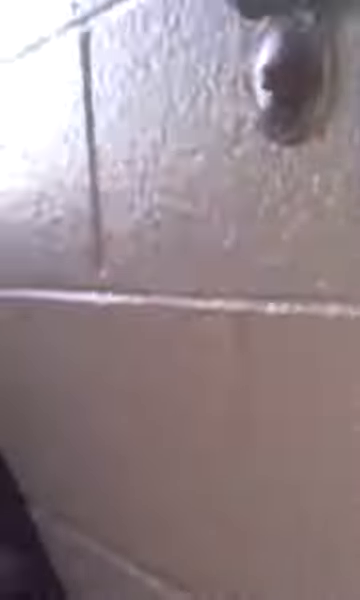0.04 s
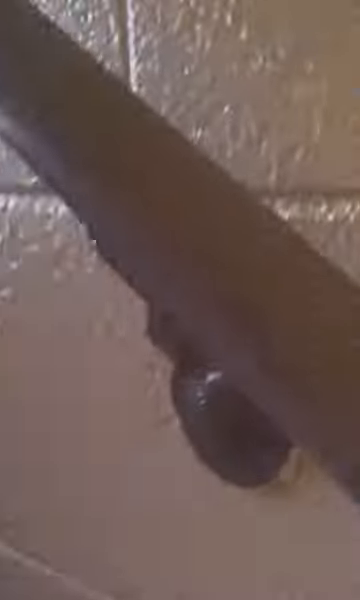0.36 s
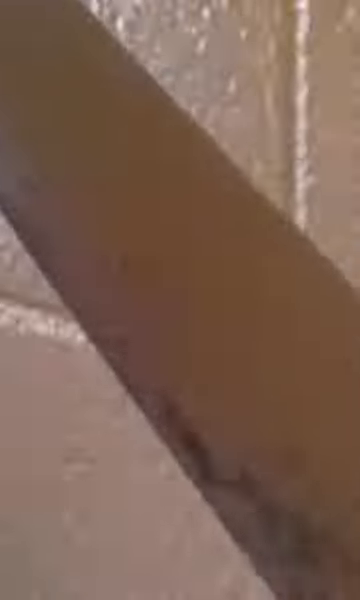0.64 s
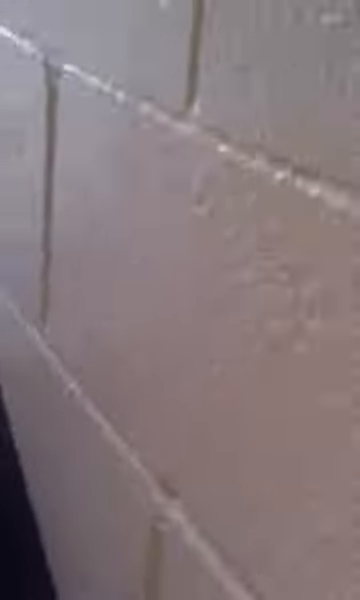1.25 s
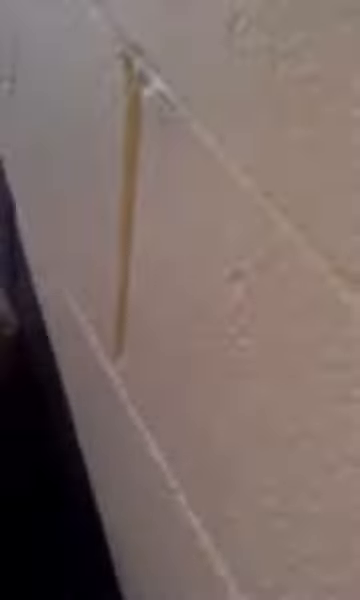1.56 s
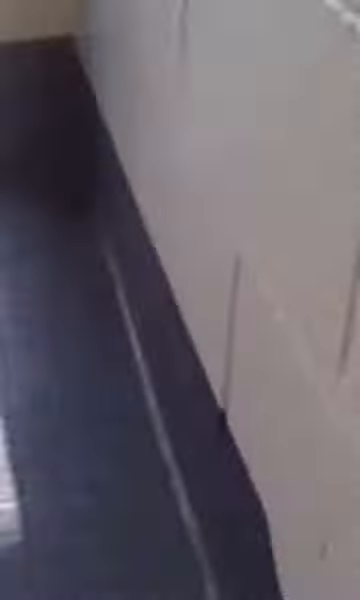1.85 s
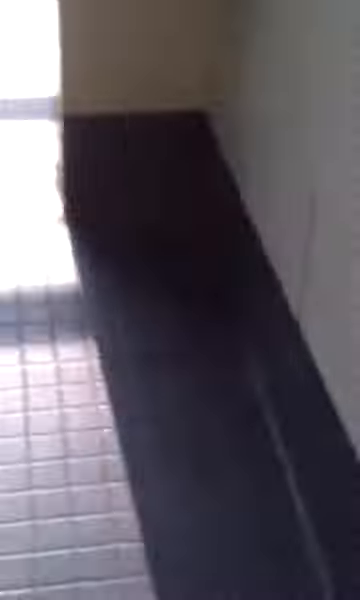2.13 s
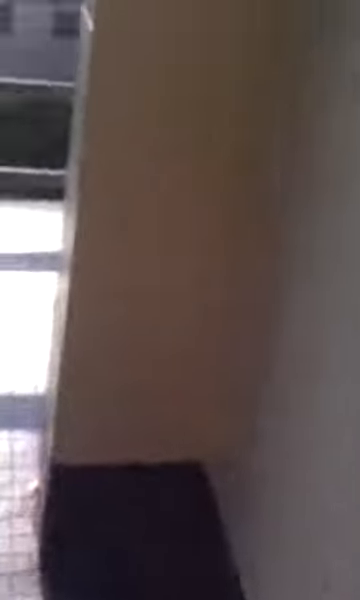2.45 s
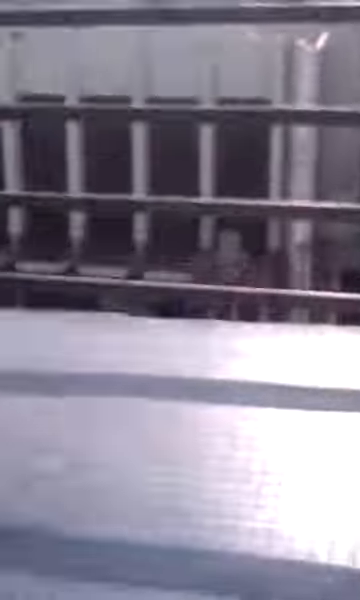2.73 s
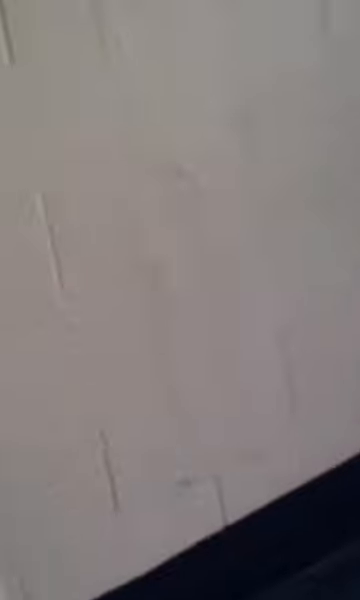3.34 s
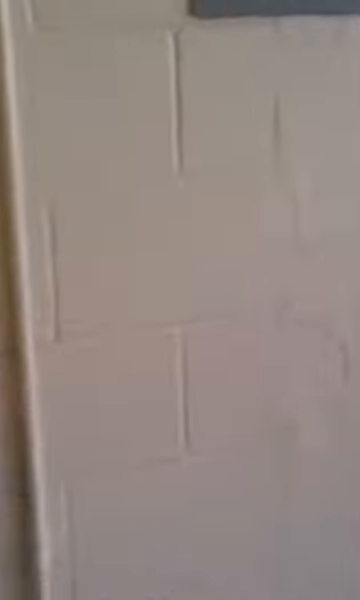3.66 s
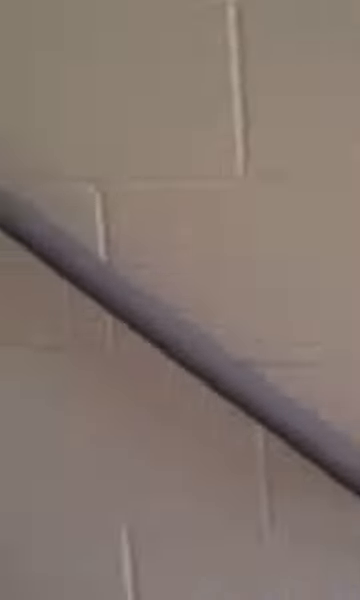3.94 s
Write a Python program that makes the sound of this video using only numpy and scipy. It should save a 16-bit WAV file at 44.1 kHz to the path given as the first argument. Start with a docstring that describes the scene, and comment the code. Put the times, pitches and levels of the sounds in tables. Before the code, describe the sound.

Shoes go down a ringing stairwell at about two steps a second, with air rushing behind them. The sound turns muffled as a hand bumps and creaks on the microphone, then opens up again for more steps.

```python
"""Shoes slap and scuff down hard stairs in a ringing block-walled stairwell, over a steady rush of air.
The recorder rides in the walker's hand, and the steps land about twice a second.
Midway a finger slides over the microphone port: the room goes dull, the grip ticks, thumps
and creaks right at the microphone, then the port opens on the stairs again."""
import sys
import numpy as np
from scipy import signal
from scipy.fft import rfft, irfft
from scipy.io import wavfile
from scipy.ndimage import uniform_filter1d, map_coordinates

SR = 44100
rng = np.random.default_rng(int(sys.argv[2]) if len(sys.argv) > 2 else 0)


def to_wav(s):
    """Save 16-bit WAV."""
    ch = np.atleast_2d(s).T  # columns
    pcm = np.round(np.clip(ch, -1, 1) * 32767)  # PCM
    wavfile.write(sys.argv[1], SR, pcm.astype(np.int16))


N = 176400
SNAP_HZ, BAND_EDGE_HZ = 7060, 8400

# Spectrum of a shoe on a tread. Each row: frequency in Hz, relative level in dB.
SHOE_SPECTRUM = [(30, -22.5), (90, -17), (170, -6.5), (260, 5.5), (480, 6), (690, 6), (1100, -1),
                 (1800, 1.5), (2400, 1.5), (3200, -3.5), (4400, -1.5), (5500, -13.5), (7100, -10),
                 (8500, -27)]


def amp(db):
    """Decibels to gain."""
    return 10 ** (np.asarray(db) / 20)


def unit(x):
    """Scales to rms 1."""
    return x / np.sqrt(np.mean(x ** 2) + 1e-20)


def curve(points, hz):
    """Interpolates (Hz, value) points on a log-frequency axis."""
    f, value = np.transpose(points)
    return np.interp(np.log(hz + 1), np.log(f + 1), value)


def bell(hz, centre, octaves):
    """A bell of height 1 on a log-frequency axis."""
    return np.exp(-.5 * (np.log2((hz + 1) / centre) / octaves) ** 2)


def add(mix, start_s, sound):
    """Mixes a sound in at a time."""
    part = mix[max(round(start_s * SR), 0):][:len(sound)]
    part += sound[:len(part)]


def noise(colour, size):
    """Noise of rms 1 whose spectrum in dB is colour(Hz)."""
    gain = amp(colour(np.fft.rfftfreq(size, 1 / SR)))
    return unit(irfft(rfft(rng.standard_normal(size)) * gain, size))


def crack(colour, decay_s, size=4096):
    """A crisp burst with the given spectrum and the energy of a unit noise dying in decay_s."""
    t = np.arange(size) / SR
    gain = amp(colour(abs(np.fft.fftfreq(size, 1 / SR))))
    burst = np.fft.fft(rng.standard_normal(size) * np.exp(-t / decay_s))
    burst /= np.sqrt(abs(burst) + 1e-12)  # evens out chance peaks
    minimum_phase = np.exp(np.conj(signal.hilbert(np.log(gain + 1e-5))))  # keeps the attack sharp
    x = np.fft.ifft(burst * minimum_phase).real[:size // 2]
    return x / np.linalg.norm(x) * np.sqrt(decay_s * SR / 2)


def spectra(x):
    """Short-time spectra: Hz column, frame times, values."""
    hz, t, frames = signal.stft(x, SR, nperseg=512, noverlap=384)
    return hz[:, None], t, frames


def waveform(frames):
    """Back from short-time spectra."""
    return signal.istft(frames, SR, nperseg=512, noverlap=384)[1][:N]


def stairwell_db(hz):
    """The colour that the stairwell's resonances give to sounds between its walls."""
    # Resonances. Each row: centre in Hz, width in Hz, lift in dB.
    resonances = [(231, 65, 2), (550, 18, 4.5), (673, 27, 4.5), (763, 50, 1.5), (916, 9.9, 2),
                  (1075, 25, 1.5), (1267, 25, 6.5), (1498, 11, 5.5), (1717, 14, 1), (2380, 19, 5),
                  (2560, 60, 3), (2760, 80, 1.5), (4015, 19, -2.5), (4430, 35, 1.5)]
    return sum(db / (1 + (2 * (hz - f) / width) ** 2) for f, width, db in resonances)


def step(level_db, thud_db, knock_db, knock_hz, snap_db, direct_db):
    """A shoe slaps below the microphone; near walls echo, the flight and the shaft ring on."""
    # Short ring of this flight. Each row: frequency in Hz, seconds to fall 60 dB.
    flight_t60 = [(150, 0.37), (700, 0.46), (2500, 0.55), (7500, 0.31)]
    # Long ring of the shaft, farther off. Each row: frequency in Hz, seconds to fall 60 dB.
    shaft_t60 = [(150, 1.2), (700, 2.24), (2500, 1.7), (7500, .8)]

    def colour(hz):
        knock = knock_db * bell(hz, knock_hz, octaves=0.22)
        thud_and_snap = curve([(250, thud_db), (500, 0), (2200, 0), (SNAP_HZ, snap_db)], hz)
        return curve(SHOE_SPECTRUM, hz) + knock + thud_and_snap - 40 * (hz > BAND_EDGE_HZ)
    hz, t, frames = spectra(noise(lambda f: colour(f) + stairwell_db(f), size=2 * SR))
    flight = 1e-3 ** (t / curve(flight_t60, hz))
    shaft = amp(-15) * 1e-3 ** (t / curve(shaft_t60, hz))
    out = waveform(frames * np.hypot(flight, shaft))
    out *= 1 - np.exp(-np.arange(len(out)) / SR / 0.0039)  # the ring builds in about 4 ms
    slap = amp(8 + direct_db) * crack(colour, decay_s=0.0019)
    add(out, 0, slap)
    for delay_s in rng.uniform(.004, .03, size=4):  # wall echoes
        add(out, delay_s, amp(-5 - direct_db) * slap * np.exp(-delay_s / .03))
    return amp(10 + level_db) * out


def air():
    """Air rushing through the stairwell, changing colour as the recorder moves."""
    # Spectrum of the moving air. Each row: frequency in Hz, relative level in dB.
    air_spectrum = [(15, -75), (25, -46.5), (98, -15), (131, -12), (148, -9.5), (180, -7), (224, 1),
                    (330, -3), (373, -0.5), (421, -2), (524, -2.5), (592, -2), (668, -2.5), (1200, -5),
                    (1290, -6), (1900, -8.5), (2490, -8.5), (3330, -13), (4460, -9), (5690, -24),
                    (6590, -20.5), (7440, -21), (8400, -32.5), (10900, -65), (18500, -120)]
    # Air and lingering ring along the way down.
    # Each row: time in seconds, level in dB, midrange lift in dB, treble lift in dB.
    air_levels = [(0, -31, -7, 5.5), (.3, -35, 0, 3.5), (.55, -34, 3.5, 3), (.8, -33.5, 2, 0.5),
                  (1.05, -33.5, 5, 0), (1.5, -34.5, 1, 2.5), (1.85, -34, -2.5, -7), (2.5, -34, -3, -2.5),
                  (2.95, -35, -6, -4.5), (3.35, -36, -4.5, -3), (3.65, -35.5, -6, -5), (3.85, -34, 0, -4),
                  (4, -34.5, 2, -7)]
    rush = noise(lambda f: curve(air_spectrum, f) + stairwell_db(f) - 40 * (f > BAND_EDGE_HZ), size=N)
    hz, t, frames = spectra(rush)
    times, *columns = np.transpose(air_levels)
    level, middle, treble = (np.interp(t, times, c) for c in columns)
    drift_db = level + middle * bell(hz, 780, octaves=0.29) + treble * bell(hz, SNAP_HZ, octaves=0.44)
    flicker = uniform_filter1d(rng.standard_normal(frames.shape[::-1]), size=16, axis=0)
    patches_db = unit(uniform_filter1d(flicker, size=6, axis=1)).T  # smooth in time and frequency
    return waveform(frames * amp(drift_db + patches_db))


def hiss():
    """The recorder's own faint, steady noise."""
    # Spectrum of the self-noise. Each row: frequency in Hz, relative level in dB.
    hiss_spectrum = [(30, 0), (200, 4.5), (700, 12), (1200, 8), (2500, -8.5), (4400, -5.5), (5800, -25),
                     (7600, -2), (8500, -16.5)]
    return amp(-58) * noise(lambda f: curve(hiss_spectrum, f), size=N)


def scuff(length_s, level_db, centre_hz, octaves):
    """Grainy friction of a sole on a tread, hanging on in the stairwell."""
    def colour(hz):
        band_db = 20 * np.log10(bell(hz, centre_hz, octaves) + 1e-6)
        return band_db + curve(SHOE_SPECTRUM, hz) + stairwell_db(hz)
    rise_s, fall_s, grain_db = 0.014, 0.057, 2
    t = np.arange(SR) / SR
    roughness = unit(uniform_filter1d(rng.standard_normal(SR), size=200))
    grain = amp(grain_db * roughness * (t < length_s))
    envelope = np.minimum(t / rise_s, 1) * np.exp(-np.maximum(t - length_s, 0) / fall_s)
    return amp(level_db) * envelope * grain * noise(colour, size=SR)


def finger_over_port(room):
    """The gap under the finger is a resonant low-pass; a little sound leaks through the casing."""
    # The gap closing and reopening. Each row: time in seconds, resonance in Hz, Q, leak in dB.
    gap_path = [(1.25, 11000, 0.7, -29), (1.45, 4650, 0.72, -22), (1.6, 3470, 0.72, -11),
                (1.73, 2800, 1.06, -12), (1.801, 1830, 0.96, -15), (1.871, 920, 0.84, -20),
                (1.92, 464, 0.64, -20), (1.97, 160, 0.45, -24), (2.03, 90.5, .6, -23.5),
                (2.25, 64.6, 0.38, -28), (2.33, 111, 0.72, -24), (2.43, 130, 0.72, -25),
                (2.485, 302, 0.69, -17), (2.52, 900, 1.2, -4.5), (2.56, 12000, 0.75, 18)]
    hz, t, frames = spectra(room)
    times, gap_hz, q, leak_db = np.transpose(gap_path)
    ratio = hz / np.exp(np.interp(t, times, np.log(gap_hz)))
    gap_power = 1 / ((1 - ratio ** 2) ** 2 + (ratio / np.interp(t, times, q)) ** 2)
    leak_power = np.maximum(1 - gap_power, 0) * amp(np.interp(t, times, leak_db)) ** 2
    return waveform(frames * np.sqrt(gap_power + leak_power))


def tick(level_db, pitch_hz, decay_ms, ring_db):
    """The casing gives a dry tick under the grip and rings faintly."""
    def colour(hz):
        skirt = amp(-20) * bell(hz, 2 * pitch_hz, octaves=1)
        return 20 * np.log10(bell(hz, pitch_hz, octaves=0.71) + skirt + 1e-4)
    ring_s = 0.016
    out = amp(ring_db) * noise(colour, size=4096) * np.exp(-np.arange(4096) / SR / ring_s)
    add(out, 0, crack(colour, decay_ms / 1000))
    return amp(level_db) * out / 2


def thump(centre_s, peak_db, pitch_hz, cycles=0.64):
    """One soft, heavily damped push of air into the port; returns start time and sound."""
    t = np.arange(-SR // 20, SR // 20) / SR
    pulse = np.cos(2 * np.pi * pitch_hz * t) / np.cosh(2 * pitch_hz * t / cycles)
    return centre_s + t[0], amp(peak_db) * pulse


def rub(level_db=-37, corner_hz=90, fade_s=0.04):
    """A brief, low rub of the hand on the casing."""
    rumble = noise(lambda f: -20 * np.log10(1 + (f / corner_hz) ** 2), size=SR)
    return amp(level_db) * np.exp(-np.arange(SR) / SR / fade_s) * rumble


def creak(start_s, end_s, slips_per_s=88):
    """Skin sticks and slips on the casing in a quick, slightly uneven train of pulses."""
    out = np.zeros(N)
    for slip_s in np.arange(start_s, end_s, 1 / slips_per_s):
        late, strength = rng.standard_normal(2)
        add(out, *thump(slip_s + .1 * late / slips_per_s, peak_db=-39.5 + 2 * strength, pitch_hz=330))
    return out


def grip():
    """Handling noise right at the microphone, with no room on it."""
    # Casing ticks. Each row: start in seconds, relative level in dB, pitch in Hz, decay in ms,
    # relative ring level in dB.
    ticks = [(1.725, -10.5, 2000, 1.2, -22), (2.006, -29.5, 1500, 1.5, -29), (2.074, -36, 1670, 1.4, -6),
             (2.107, -32, 1800, 3, -8), (2.1204, -22.5, 1480, 2.4, -22.5), (2.1628, -21, 1320, 1.5, -29),
             (2.236, -29.5, 1120, 1.1, -27), (2.2877, -14, 820, 1.7, -16.5), (2.448, -41, 1800, 4, -7),
             (2.457, -39, 1520, 5, -10), (2.489, -32.5, 2160, 6.7, -10)]
    # Finger pushes on the port. Each row: centre in seconds, peak in dB, pitch in Hz.
    thumps = [(2.050, -29, 403), (2.056, -25.5, 407), (2.0581, -17, 190), (2.0638, -32, 111),
              (2.0732, -29, 112), (2.0788, -28.5, 280), (2.087, -40, 70), (2.116, -43, 100),
              (2.158, -32, 327), (2.1765, -38, 300), (2.199, -32, 280), (2.2903, -19, 260),
              (2.2991, -24.5, 413), (2.4492, -32.5, 305), (2.491, -28, 335), (2.500, -35, 220),
              (2.516, -32, 200)]
    out = np.zeros(N)
    for start_s, *row in ticks:
        add(out, start_s, tick(*row))
    for row in thumps:
        add(out, *thump(*row))
    add(out, start_s=2.06, sound=rub())
    return out + creak(start_s=2.3175, end_s=2.43)


def scene():
    """The stairwell heard through the port, plus the hand on the recorder; mono on both channels."""
    # Shoe contacts. Each row: start in seconds, relative level in dB, thud lift in dB, knock lift in dB,
    # knock pitch in Hz, snap lift in dB, direct sound lift in dB.
    steps = [(.001, -44, -5.5, -2, 700, 2.5, 0), (.0182, -40.5, 1, -4, 700, 3.5, 5),
             (0.538, -47.5, -1, -6.5, 696, 2, 4), (1.0885, -30.5, 6, 1, 524, 8, 2.5),
             (1.0968, -35, -2, 4.5, 525, 0, 6.5), (1.5875, -36, -0.5, 0.5, 700, 2.5, 2),
             (1.6025, -36, 5, 4, 477, 3, 5), (2.5873, -32, -4, -2.5, 480, 1.5, 2),
             (3.093, -37, -14, 12, 970, -7, 3), (3.1098, -28.5, -0.5, 8, 800, -5.5, -0.5),
             (3.130, -36.5, -1, 2, 680, -5.5, -15), (3.81, -44.5, -6, -8, 750, -3, -1)]
    # Sliding soles. Each row: start and length in seconds, level in dB, centre in Hz, width in octaves.
    scuffs = [(0.014, 0.017, -37.5, 4100, .2), (3.114, .035, -29, 3730, 0.39),
              (0.536, 0.04, -37, 4550, 0.27), (0.533, 0.031, -36, 7250, 0.45),
              (0.54, 0.036, -43, 2220, 1.4), (0.659, .04, -32, 2300, 0.92), (1.64, 0.087, -39, 2030, 0.46),
              (2.511, 0.041, -45.5, 4100, 1.3), (2.831, 0.018, -49, 7100, 0.15),
              (3.74, 0.067, -38, 786, 2.6)]
    room = air()
    for start_s, *row in steps:
        add(room, start_s, step(*row))
    for start_s, *row in scuffs:
        add(room, start_s, scuff(*row))
    return np.tile(finger_over_port(room) + hiss() + grip(), (2, 1))


def record(dry):
    """The recorder's input rounds off the hardest peaks, and its band limit cuts the top treble."""
    headroom = .55
    clipped = dry / (1 + (dry / headroom) ** 6) ** (1 / 6)
    low_pass = signal.firwin(151, BAND_EDGE_HZ, window=("kaiser", 8), fs=SR)
    return signal.oaconvolve(clipped, low_pass[None], "same")


dry = scene()
out = record(dry)
to_wav(out)
```